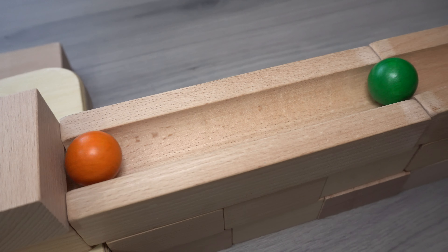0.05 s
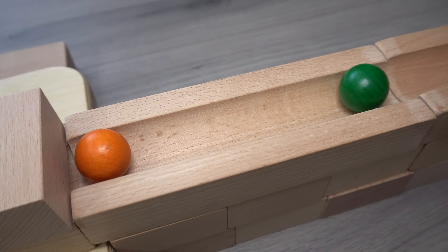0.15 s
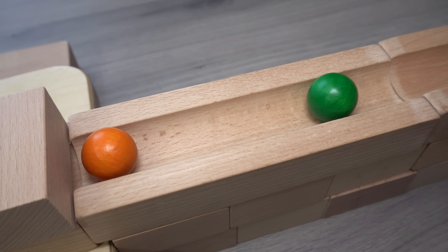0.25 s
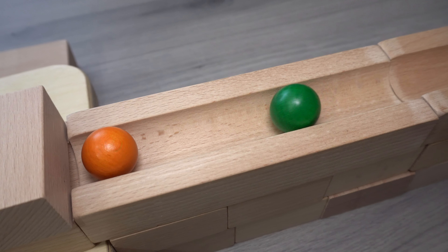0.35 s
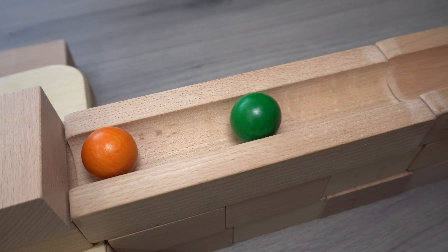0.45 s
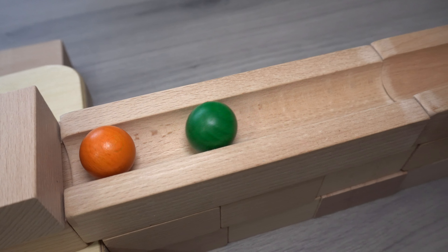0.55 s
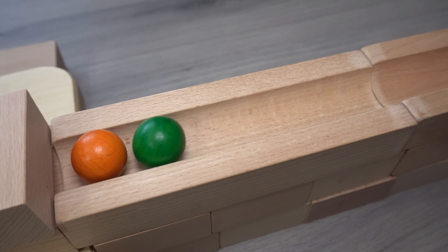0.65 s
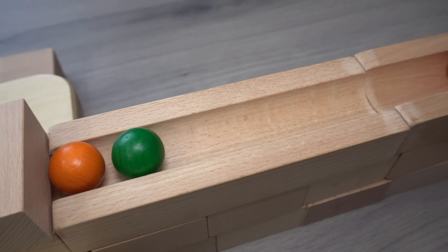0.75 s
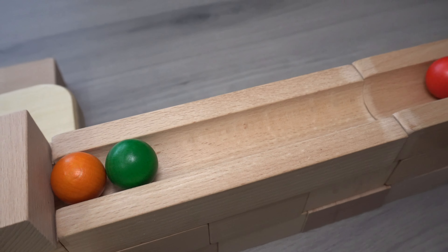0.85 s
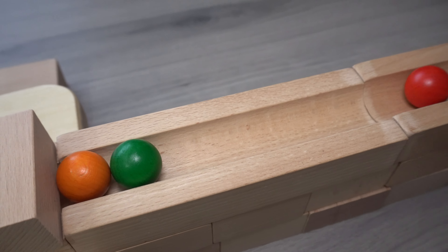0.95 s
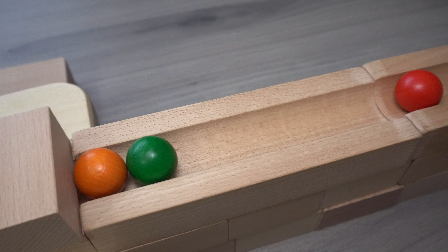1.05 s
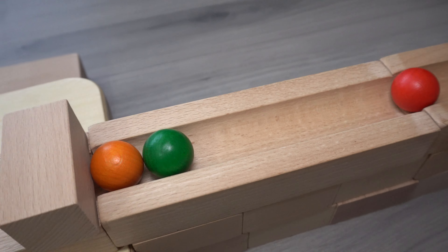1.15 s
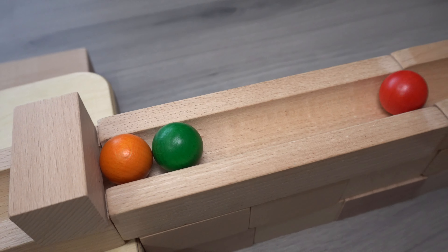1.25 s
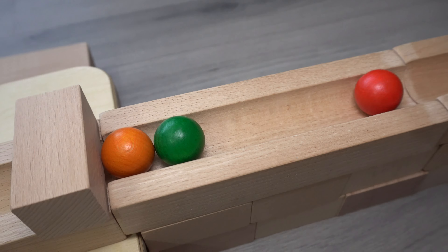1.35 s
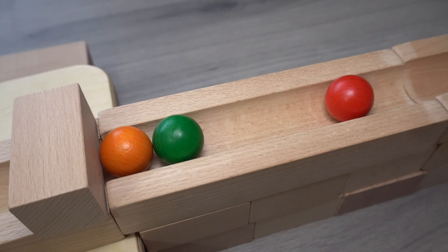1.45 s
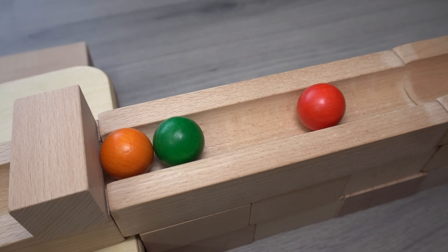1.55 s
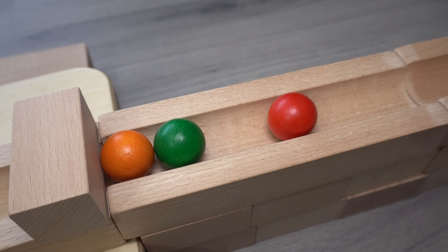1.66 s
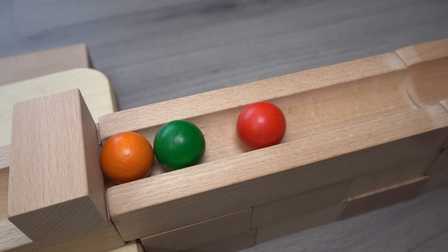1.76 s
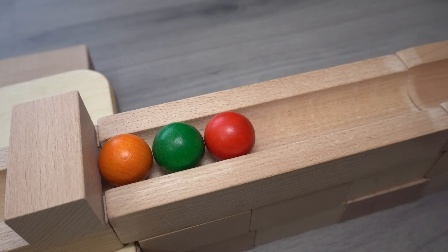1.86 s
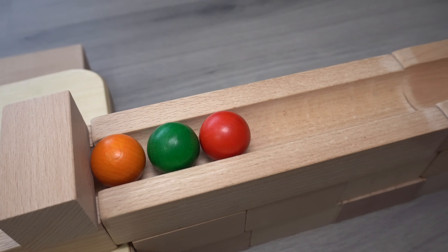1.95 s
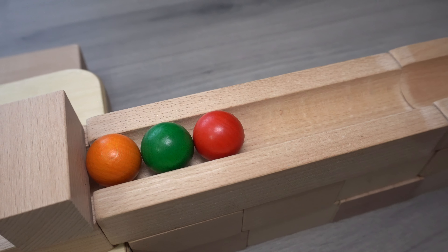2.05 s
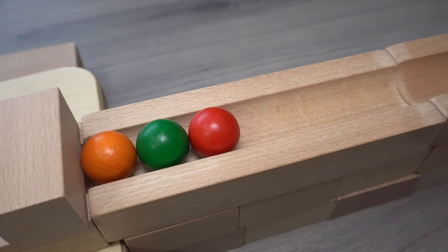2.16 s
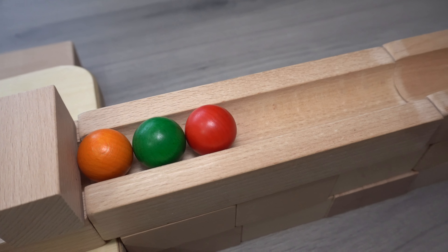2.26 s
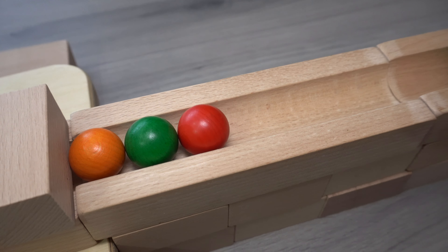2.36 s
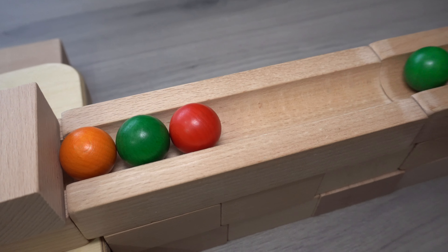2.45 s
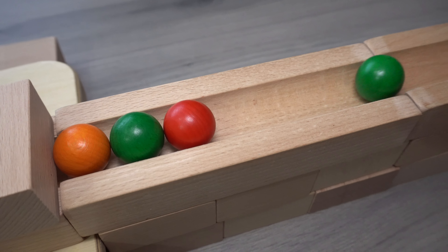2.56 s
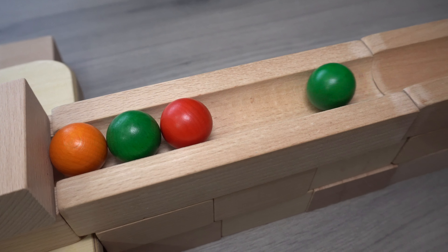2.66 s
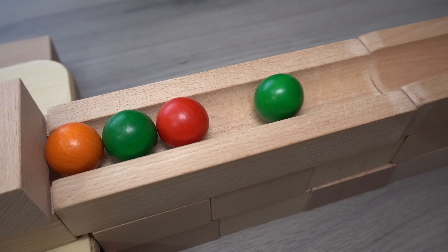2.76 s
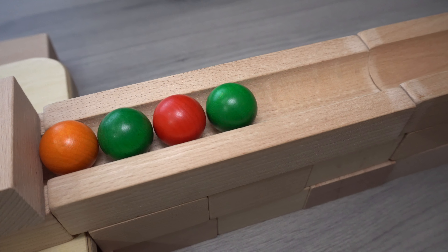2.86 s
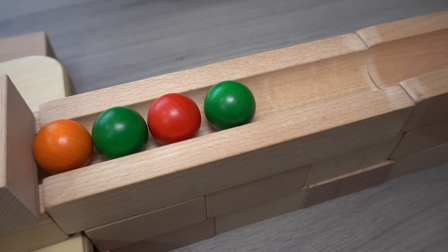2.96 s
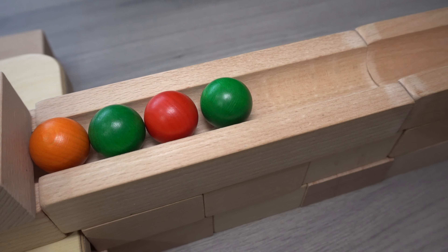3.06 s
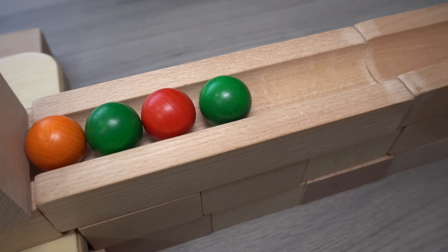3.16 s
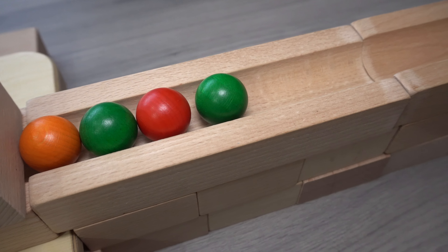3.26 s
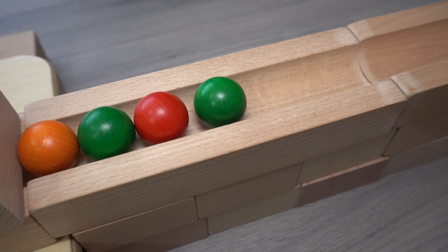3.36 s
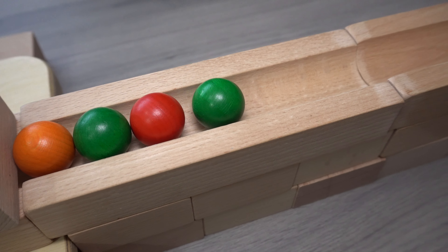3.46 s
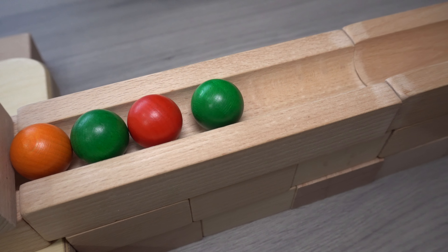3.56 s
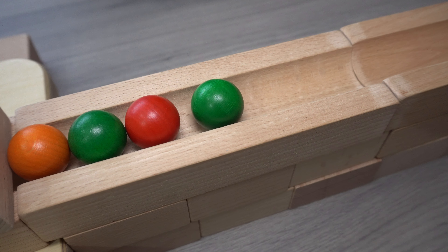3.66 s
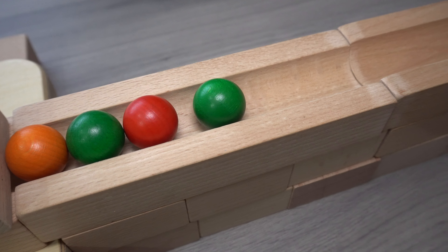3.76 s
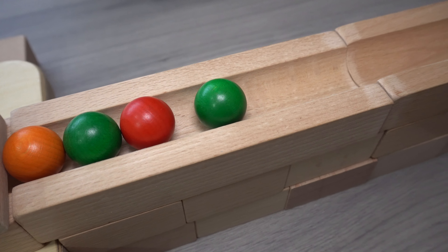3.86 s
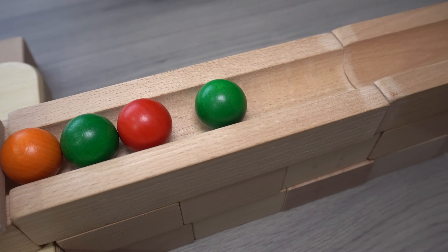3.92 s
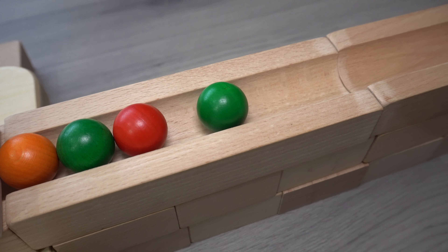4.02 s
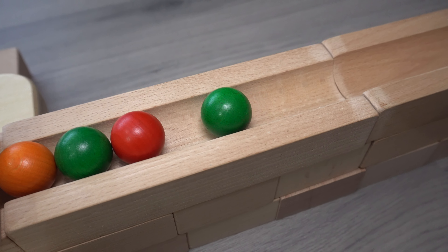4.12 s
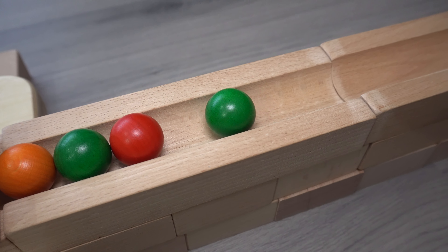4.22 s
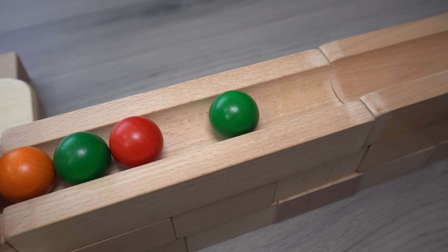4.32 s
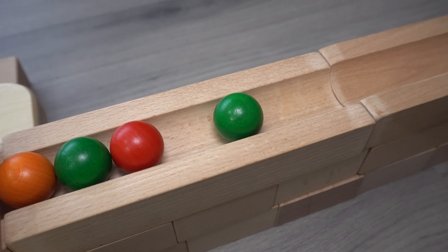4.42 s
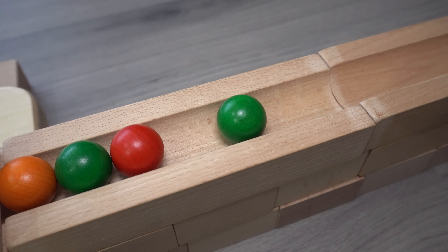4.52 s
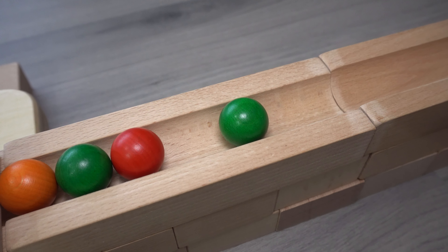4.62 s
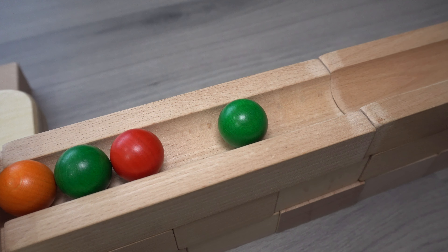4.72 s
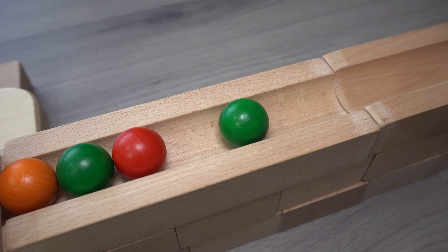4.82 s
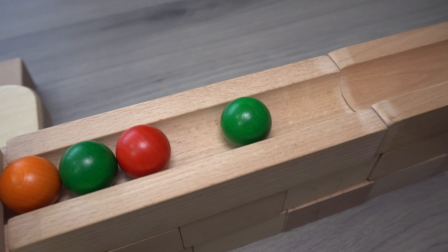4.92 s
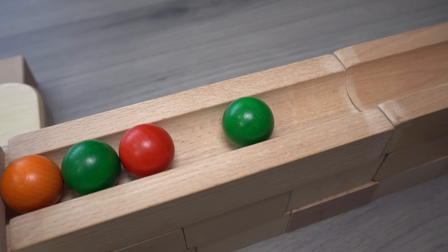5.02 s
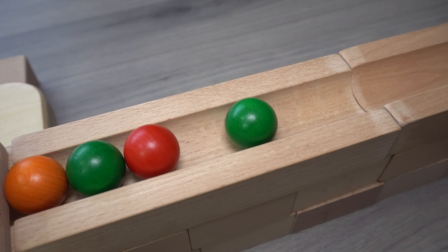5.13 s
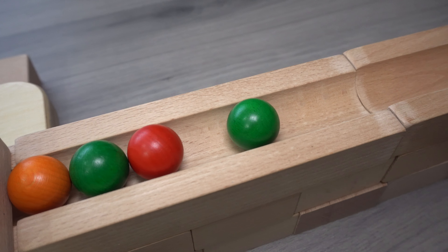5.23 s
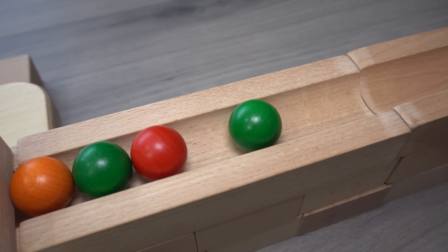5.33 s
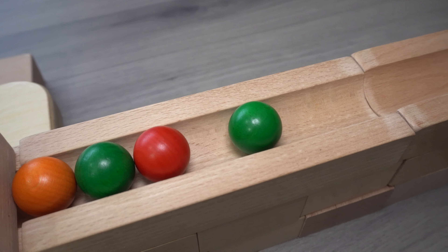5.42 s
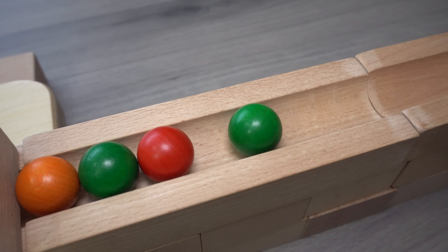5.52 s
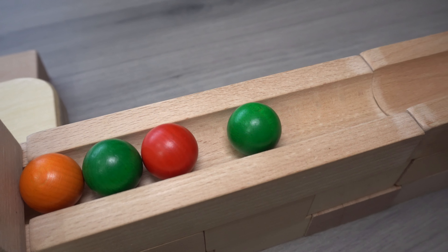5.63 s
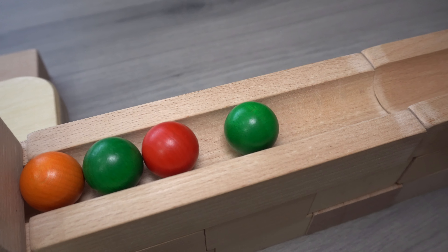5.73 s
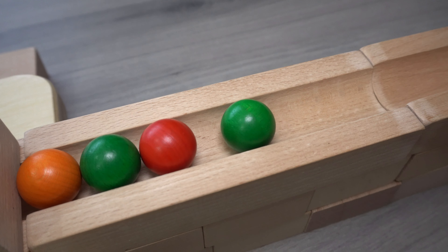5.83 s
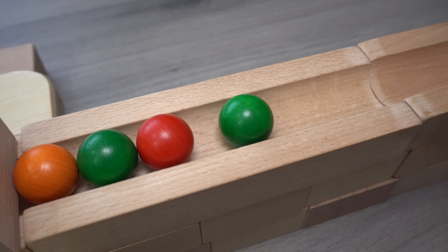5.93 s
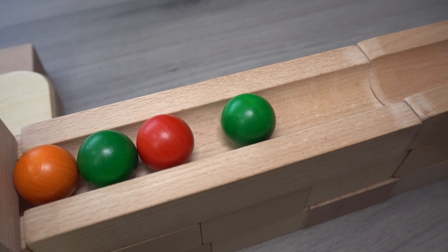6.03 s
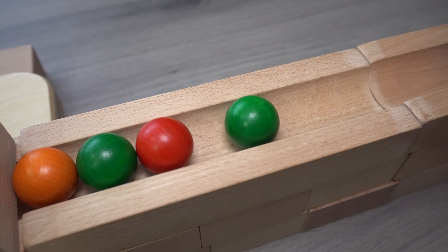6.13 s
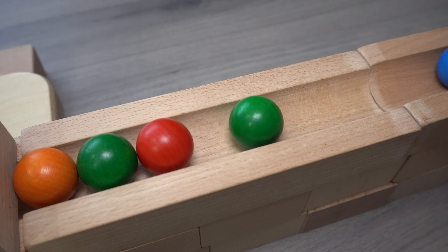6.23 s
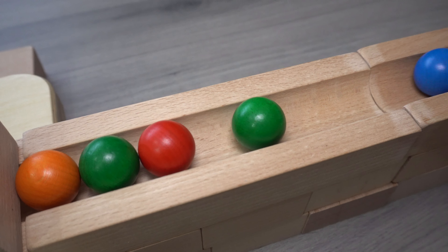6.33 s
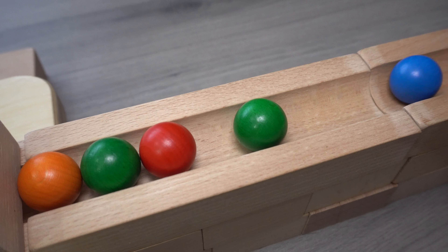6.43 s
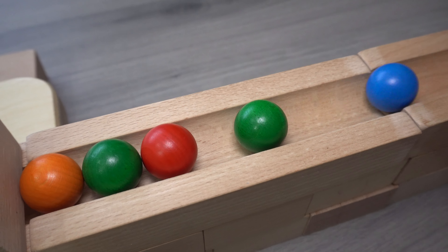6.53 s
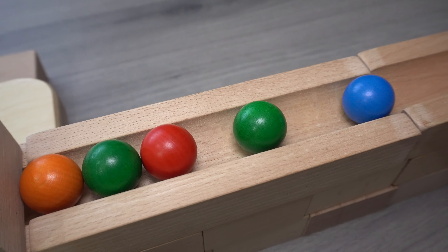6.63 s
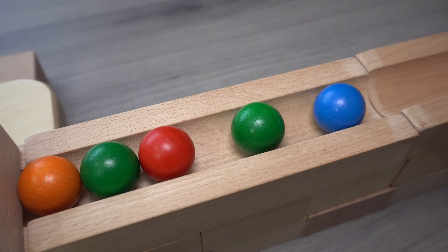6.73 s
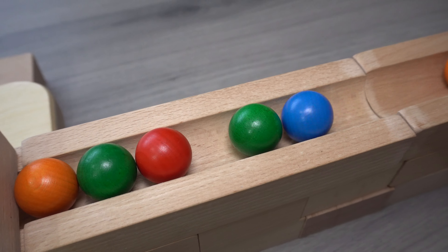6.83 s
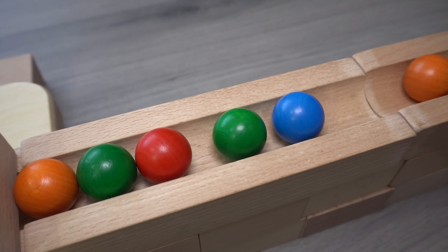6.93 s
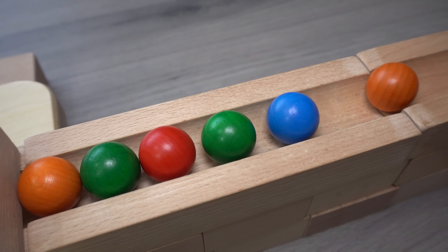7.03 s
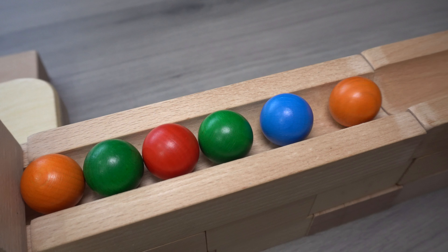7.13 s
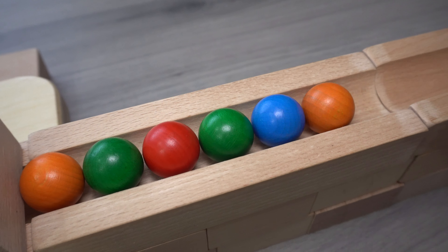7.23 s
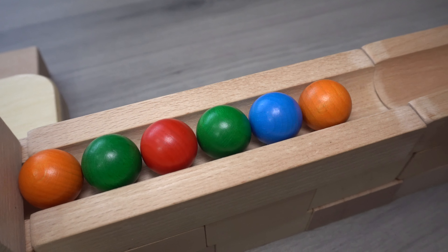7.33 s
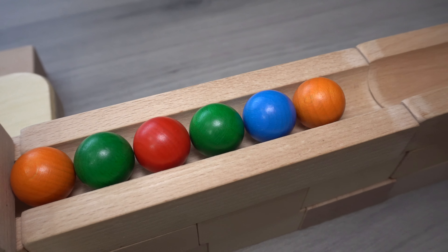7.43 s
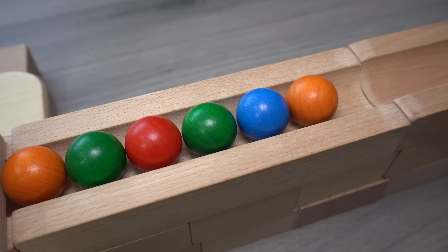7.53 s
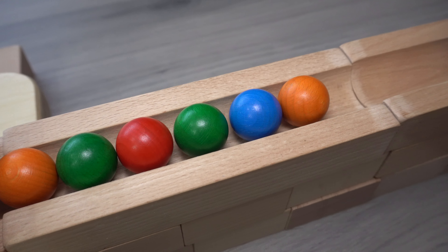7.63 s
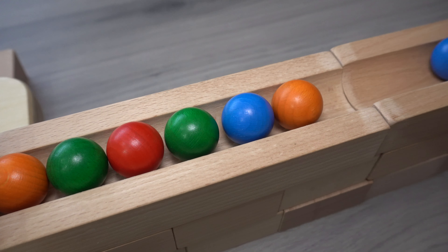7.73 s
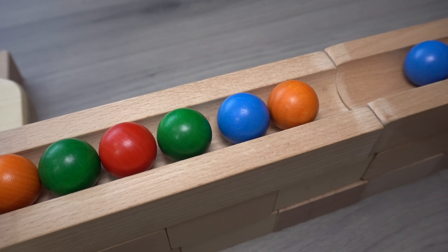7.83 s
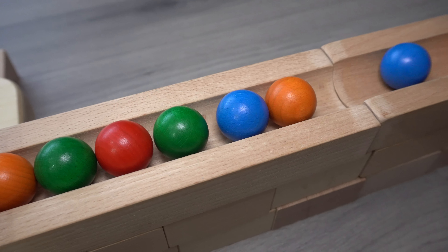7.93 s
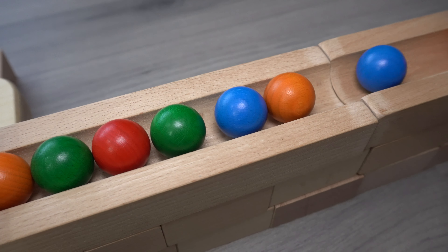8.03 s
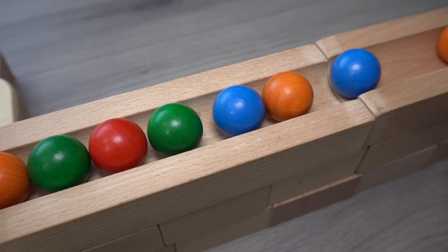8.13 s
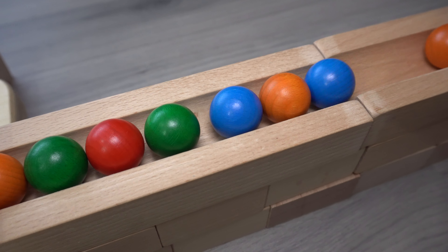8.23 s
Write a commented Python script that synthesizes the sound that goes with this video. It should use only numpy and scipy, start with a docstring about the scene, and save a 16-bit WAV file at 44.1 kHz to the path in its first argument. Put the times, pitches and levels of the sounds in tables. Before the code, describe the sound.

Close in a small room with faint steady noise, a wooden ball rattles at once and clacks hard at 0.1 s. Short block rattles at 0.5 and 0.7 s lead to three crisp clacks between 0.7 and 0.9. From 1.0 to 1.35 s a gritty skid mixes with a flurry of woody knocks. A clack at 1.9 precedes a bright, bouncing clatter at 2.1-2.3 and knocks at 2.6. A strong clack at 2.9 begins scraping strokes, dull bumps and a brief thin whistle, with lighter clacks around 3.5, fading after 4.1. A faint brush and rolling murmur remain until clatter at 5.2, a knock at 5.5, and rattles at 6.0 and 6.5. A clack at 6.9, another rattle at 7.05 and a tight cluster of clacks at 7.25 follow. At 7.8 dull bumps start rough rubbing, ending in a groan rising from 8.05 to 8.3.

```python
"""Wooden balls on a toy track

In a small room, balls clatter through ringing blocks, knock over joints, roll along a groove and
clack into a queue. Something, probably a hand or sleeve, rubs the wood in between.
Blows excite resonances; clatter, rolling and rubbing are streams of tiny random contacts, filtered
by wood. Groan and whistles are narrow unsteady tones. Steady noise lies beneath.
"""
import sys
import numpy as np
from scipy import signal
from scipy.fft import rfft, irfft
from scipy.io import wavfile

SR = 44100
rng = np.random.default_rng(int(sys.argv[2]) if len(sys.argv) > 2 else 0)


def put_to_file(sound):
    """Save the sound as 16-bit audio at rate SR, in the file named by the first command-line argument."""
    columns = np.atleast_2d(sound).T  # one column per channel
    safe = np.clip(columns, -1, 1)
    whole_steps = np.round(safe * 32767)
    wavfile.write(sys.argv[1], SR, whole_steps.astype(np.int16))


N = 365148
TIME_S = np.arange(N) / SR

# Levels in the tables are relative: trims, room and microphone follow.
# steady background noise spectrum: (f/Hz, density/dB)
AIR_SPECTRUM = [(20, -29), (82, 6.5), (141, -0.5), (310, 4), (390, -0.5), (2910, -14), (6380, -18.5),
                (16000, -24)]
AIR_DB = -53.5
# room decay: (f/Hz, t60/s)
ROOM_T60 = [(100, 0.88), (500, 0.32), (1500, 0.42), (3500, 0.36), (7000, 0.28), (15000, 0.68)]
# microphone response: (f/Hz, level/dB)
MIC_RESPONSE = [(140, -1), (300, -2.5), (600, 0.27), (1200, -0.5), (2400, 2), (4000, -0.5), (8000, 2.5),
                (15000, 1.5)]
CUTOFF_HZ = 16100

# rolling, loudest moments: (t/s, level/dB, tick share/dB)
ROLLS = [(.15, -50.5, -3.5), (.85, -54.5, 0.5), (2.65, -50, -4), (3.7, -48.5, -20), (5.08, -44.5, -31),
         (5.6, -48.5, -12.5), (6.8, -48, -2), (8.25, -45, -19)]
# rolling murmur spectrum: (f/Hz, density/dB)
ROLL_SPECTRUM = [(50, -6.5), (150, -1), (430, 1.5), (750, -5.5), (1400, -17.5), (5000, -16.5)]
ROLL_GAIN_DB_PER_S, ROLL_LOSS_DB_PER_S = 19, 14.5
TICKS_PER_S, TICK_TOP_HZ = 64, 1310

# thin whistles over rubbing and rolling: (t/s, rise/s, hold/s, t60/s, level/dB, f/Hz)
WHISTLES = [(2.955, 0.012, 0.029, .15, -33.5, 2270), (4.882, .1, 0.27, .2, -61.5, 2060)]
# groan under the last two strokes, a curve: (t/s, base f/Hz, level/dB)
GROAN_CURVE = [(8.05, 265, -36), (8.095, 310.6, -26.5), (8.135, 349.8, -35), (8.192, 409.3, -29),
               (8.234, 462.4, -24), (8.28, 497, -36)]
# groan resonances: (multiple of base f, level/dB)
GROAN_MODES = [(0.998, -2.5), (1.801, -1), (2.7, -3), (3.65, -4)]
# rubbing strokes: (t/s, rise/s, hold/s, t60/s, level/dB, bass share/dB, treble share/dB, wood ring/dB)
RUBS = [(2.679, 0.035, 0.026, 0.5, -40, 3, -9.5, 8.5), (2.814, 0.042, 0.03, 0.43, -44, -2, -3.5, 8),
        (2.893, 0.078, 0.026, 1, -27.5, -17.5, -9, 1.5), (3.095, 0.053, 0.1, 0.73, -26, -14, -8, -5),
        (3.339, 0.022, 0.026, 0.45, -32, -12, -11, -9), (3.56, 0.019, 0.03, 1, -42, -20, -15, -8),
        (3.725, 0.043, 0.035, 0.94, -46, -22, -13, 0), (3.89, 0.013, 0.053, 0.35, -29.5, -9, -10, 3),
        (4.122, 0.03, 0.03, 0.43, -45.5, -13, -17, -24), (7.782, 0.0051, 0.033, 0.68, -35, 2, -8, 5),
        (7.916, 0.0071, 0.07, 0.89, -27, -16, -12, 5.5), (8.047, 0.041, 0.019, 0.26, -25.5, -16, -9.5, 0),
        (8.135, 0.031, 0.22, .5, -26.5, -22, -5.5, -13)]
# short brushes: (t/s, level/dB, t60/s, added treble/dB)
BRUSHES = [(3.068, -23.5, 0.11, -26), (3.189, -23.5, 0.23, 23), (3.325, -25, 0.16, 10),
           (3.487, -30, 0.065, 4.5), (3.870, -32.5, 0.076, 1), (3.8931, -21, 0.12, 8),
           (4.336, -44, 0.37, -31), (4.631, -36.5, 0.23, 3), (7.946, -25.5, 0.16, 2)]
# rubbing spectrum: (f/Hz, density/dB)
RUB_SPECTRUM = [(40, -20.5), (140, 6.5), (300, 6), (650, 2.1), (1200, -3), (1750, 1), (2400, -1.5),
                (4500, -3), (7000, -11), (11000, -19), (16000, -30)]
# wood ringing under the rubbing: (f/Hz, width/Hz, level/dB)
RUBBED_MODES = [(592, 150, -3), (912, 125, 0.5), (1100, 330, -1.5), (1644, 93, 0)]
# skids along the groove: (t/s, rise/s, hold/s, t60/s, level/dB, bass share/dB, treble share/dB)
SKIDS = [(1.027, 0.024, 0.062, 0.031, -17.5, -13, -11.5), (1.125, 0.037, 0.087, 0.47, -31, -4, -20.5),
         (1.358, 0.02, 0.036, 0.12, -44, 11, 1)]
# skid spectrum: (f/Hz, density/dB)
SKID_SPECTRUM = [(50, -34), (300, -27), (600, -7), (1000, 5.5), (1450, 7), (2500, 0.5), (4000, -5.5),
                 (6300, -11.5), (8000, -19.5), (16000, -38)]
STROKE_RISE_DB = 8  # gained while getting up to speed
TREBLE_FOLLOWS = 0.92  # treble dB per dB of stroke

# dull bumps against blocks: (t/s, peak/dB, f/Hz)
BUMPS = [(0.8945, -30, 600), (2.9200, -24, 1080), (2.9520, -21, 547), (3.0660, -22, 710),
         (3.1420, -18, 725), (3.3240, -18.5, 696), (3.3385, -29, 660), (3.759, -27, 496),
         (3.871, -26.5, 550), (4.631, -32, 440), (7.7850, -21, 725), (7.7964, -15.5, 310),
         (7.8093, -21, 304), (7.8431, -23.5, 394)]
# bumped block: (multiple of its f, width/Hz, level/dB)
BUMP_MODES = [(.65, 60, 8), (1, 55.3, 16.5), (2.5, 185.2, -3)]
# knocks on the track: (t/s, peak/dB, contact hardness f/Hz, touches, touch spacing/s)
KNOCKS = [(0.0938, -23, 1800, 1, 0), (0.1222, -9, 4000, 1, 0), (0.142, -11, 1510, 1, 0),
          (1.0268, -9.5, 4960, 1, 0), (1.1197, -13, 2200, 1, 0), (1.1712, -10, 2200, 1, 0),
          (1.1984, -11, 1800, 2, 0.015), (1.2248, -12, 1800, 1, 0), (1.24, -17, 1400, 4, .009),
          (1.2761, -13, 4000, 2, .009), (1.3399, -15, 775, 3, 0.006), (2.1064, -19.5, 1700, 2, .003),
          (2.446, -29.5, 1400, 2, 0.038), (2.604, -11, 3600, 1, 0), (2.6153, -16, 3180, 1, 0),
          (2.6325, -24, 1700, 2, 0.031), (2.9026, -16, 4000, 1, 0), (3.066, -12.5, 4000, 2, .0245),
          (5.5269, -19, 3100, 1, 0), (6.875, -26, 1500, 1, 0)]
# track wood: (f/Hz, width/Hz, level/dB)
TRACK_MODES = [(800, 870, 2.5), (1060, 430, 12.2), (1476, 190, 13), (2580, 710, 4.6), (3680, 260, 6.5)]
REBOUND_LOSS_DB = 2.5  # per touch

# runs through the upper blocks: (t/s, length/s, level/dB, chatter t60/s before sag, landing peak/dB)
RUNS = [(0.0, 0.033, -25.5, 0.13, -15.5), (0.529, 0.076, -29.5, 0.4, -11), (0.667, 0.027, -34.5, 0.13, -11),
        (2.1176, 0.074, -24.5, 0.35, -15), (5.226, 0.13, -28, 0.26, -12), (6.014, 0.075, -25, 0.25, -18),
        (6.5187, 0.054, -27, 0.51, -7), (7.019, 0.0092, -31.5, 0.17, -14.5),
        (7.0532, 0.071, -26.5, 0.21, -17)]
# ringing blocks, one row per run: (low, middle, high mode f/Hz, two overtones f/Hz)
BLOCK_HZ = [(1750, 3130, 3900, 6500, 7050), (1760, 2350, 3150, 5400, 6700), (1660, 2350, 3650, 5400, 7200),
            (1690, 2750, 3690, 7650, 8450), (1750, 3170, 4080, 7100, 10700), (1770, 3190, 4050, 6050, 6900),
            (1630, 2730, 3740, 5850, 7900), (1750, 2400, 3130, 7150, 10700), (1750, 3110, 4120, 6600, 7150)]
# block balance, one row per run: (low, middle, high mode level/dB, top edge f/Hz,
# treble past the edge level/dB, wood tilt/dB per octave, ring climb towards the high mode/dB per s)
BLOCK_BALANCE = [(12, 21, 9, 4440, -15, -0.5, 0), (14, 4, 5, 3620, -13, -6, 3),
                 (14, -7, 5, 4060, -3, -6, 0), (6, 26.5, 28.5, 4240, 0, 4.5, 10),
                 (13, 14.5, 16, 3750, -5.5, -2.5, 36), (12, 27, 18, 4900, -5, 2, 0),
                 (25, 20, 17, 4100, -7, 0.5, 73), (12, 8, 11, 3300, 4, -4, 0),
                 (8, 22, 17, 4300, -5.5, 3, 0)]
# hard bounces within the clatter: (t/s, peak/dB)
BOUNCES = [(0.570, -13.5), (.6820, -15.5), (2.174, -19), (2.2037, -11.5), (2.2560, -7), (2.2636, -8),
           (2.2949, -9), (5.281, -9), (5.333, -10), (6.5689, -11), (6.6167, -9), (6.6622, -10),
           (6.6789, -9.5), (7.1350, -9), (7.1491, -7)]
# wooden rattle spectrum: (f/Hz, density/dB)
CLATTER_SPECTRUM = [(40, -38), (100, 1), (170, 4.5), (380, 2.5), (750, 4), (1400, 9), (2200, 2),
                    (3600, 4.5), (6500, -3), (16000, -16)]
# frame under the blocks: (f/Hz, width/Hz, level/dB)
FRAME_MODES = [(172, 55, 10.8)]
SWELL_S, SWELL_DB, SAG_DB_PER_S = 0.046, 2.5, 26  # swell after landing, sag as the ball loses speed
FLARE_DB, FLARE_T60_S = -27, 0.1  # chatter stirred up by a hard bounce
RING_FADE_DB_PER_S, RING_SETTLES_S = 9, 0.088

# ball meets ball: (t/s, peak/dB, f/Hz, end-block thud/dB, bright crack/dB)
CLACKS = [(0.1306, -4, 3030, -19.5, -25), (0.7397, -7, 2730, -49, -22), (0.814, -7, 2680, -19.5, -22),
          (0.8717, -11, 2350, -50, -36), (1.9200, -6.5, 2510, -26.5, -22), (2.9103, -4, 2730, -30, -36),
          (3.4375, -11, 3230, -46, -8.5), (3.5615, -20.5, 2920, -59, -33), (6.9038, -9, 4040, -38, -48),
          (7.2516, -7, 4200, -50, -46), (7.2583, -12.5, 4560, -38, -14), (7.2626, -4, 2660, -24.5, -38),
          (7.2705, -21, 4220, -31, -30), (7.3994, -17.5, 3900, -57, -38)]
# struck balls at reference pitch: (f/Hz, width/Hz, level/dB)
BALL_MODES = [(2730, 1200, 26.5), (3850, 770, 14.5)]
# end block of the queue: (f/Hz, width/Hz, level/dB)
END_BLOCK_MODES = [(250, 25, 7), (390, 110, 0.87), (632, 200, 5.1), (1000, 230, 8.2)]


def from_db(db):
    """Decibels to gain."""
    return 10 ** (np.asarray(db) / 20)


def rms_one(x):
    """Scale to rms 1."""
    return x / np.sqrt(np.mean(x ** 2) + 1e-20)


def peak_one(x):
    """Scale to peak 1."""
    return x / np.abs(x).max()


def at_hz(points, hz):
    """Read a table on a log-frequency axis."""
    table_hz, values = np.transpose(points)
    return np.interp(np.log(hz + 1), np.log(table_hz), values)


def cut(x, hz, kind, order=2):
    """Butterworth filter."""
    sos = signal.butter(order, np.clip(hz, 10, SR / 2 - 1000), kind, fs=SR, output="sos")
    return signal.sosfilt(sos, x)


def add(track, s, sound):
    """Mix a sound into a track at time s."""
    start = max(round(s * SR), 0)
    track[start:start + len(sound)] += sound[:max(N - start, 0)]


def through(x, response):
    """Convolve with an impulse response, keeping the length."""
    return signal.fftconvolve(x, response)[:len(x)]


def coloured(spectrum, size=4096):
    """Minimum-phase impulse response of a spectrum, by folding its cepstrum."""
    bins_hz = np.arange(size // 2 + 1) * SR / size
    cepstrum = irfft(np.log(from_db(at_hz(spectrum, bins_hz))))
    cepstrum[1:size // 2] *= 2
    return irfft(np.exp(rfft(cepstrum[:size // 2], size)))


def ringing(modes, size=4096):
    """Impulse response of parallel two-pole resonances."""
    out = np.zeros(size)
    impulse = signal.unit_impulse(size) + 1e-18
    for hz, width_hz, db in modes:
        r = np.exp(-np.pi * width_hz / SR)
        poles = [1, -2 * r * np.cos(2 * np.pi * hz / SR), r * r]
        out += from_db(db) * (1 - r * r) / 2 * signal.lfilter([1, 0, -1], poles, impulse)
    return out


def grains(count, per_s, spread_db):
    """Tiny random contacts of uneven strength and sign; rms 1."""
    strength_db = spread_db * np.clip(rng.standard_normal(count), -2, 2)
    sizes = from_db(strength_db) * rng.choice([-1, 1], count)
    return rms_one(sizes * (rng.random(count) < per_s / SR))


def wander(count, per_s):
    """Smooth random wobble of spread about 1: random points joined by lines."""
    steps = np.arange(count) * per_s / SR
    points = int(steps[-1]) + 2
    return np.interp(steps, np.arange(points), rng.standard_normal(points))


def controls(rows):
    """Columns of a curve, sample by sample over its own span."""
    s, *columns = np.transpose(rows)
    span_s = np.arange(s[0], s[-1], 1 / SR)
    return [np.interp(span_s, s, column) for column in columns]


def stroke(age_s, rise_s, hold_s, t60_s, rise_db):
    """Rise, hold and release of one movement, in dB below its top."""
    rise = -rise_db * np.clip(1 - age_s / rise_s, 0, 1)
    return rise - 60 * np.maximum(age_s - rise_s - hold_s, 0) / t60_s


def scattered(x, db, t60_s):
    """A blow runs back and forth through the wood: a short, dense after-ring."""
    spread = rng.standard_normal(len(x)) * from_db(-60 * TIME_S[:len(x)] / t60_s)
    return x + from_db(db) * through(x, spread / np.sqrt(np.sum(spread ** 2)))


def bending(x, delay_s=0.0078, middle_hz=700):
    """Bending waves: low notes travel slowest, so a thud sweeps down; delay_s holds at middle_hz."""
    hz = np.arange(len(x) + 1) * SR / (2 * len(x))
    phase = 4 * np.pi * delay_s * np.sqrt(hz * middle_hz)
    return irfft(rfft(x, 2 * len(x)) * np.exp(-1j * phase))[:len(x)]


def shifting(contacts, modes, shift_db, glide, per_s):
    """The contact point moves, so each mode swells, fades and drifts in pitch on its own."""
    count, out = len(contacts), 0.0
    for mode in modes:
        uneven = contacts * from_db(shift_db * wander(count, per_s))
        ring = through(uneven, ringing([mode]))
        read_at = np.cumsum(np.exp(glide * wander(count, per_s)))
        out = out + np.interp(read_at, np.arange(count), ring, right=0)
    return out


def unsteady(turn, per_s):
    """A narrow noise band: a tone whose sine and cosine parts wander apart."""
    sine = wander(len(turn), per_s) * np.sin(turn)
    return sine + wander(len(turn), per_s) * np.cos(turn)


def friction(row, spectrum, per_s, spread_db, catch_db, modes=(), surge_db=1.46):
    """Grain catches unevenly under a stroke; all bands swell with it, treble slightly less."""
    s, rise_s, hold_s, t60_s, db, bass_db, treble_db = row
    speed_db = stroke(TIME_S[:SR * 3 // 4], rise_s, hold_s, t60_s, STROKE_RISE_DB)
    count = len(speed_db)
    grip_db = catch_db * wander(count, per_s=110) + surge_db * wander(count, per_s=34)
    contacts = from_db(grip_db) * grains(count, per_s, spread_db)
    grit = through(contacts, coloured(spectrum))
    grit = grit + shifting(contacts, modes, shift_db=1.5, glide=0.12, per_s=17.3)
    bass = rms_one(cut(grit, 500, "low", order=4))
    middle = rms_one(cut(grit, [500, 4500], "band", order=4))
    treble = rms_one(cut(grit, 4500, "high", order=4))
    sound = from_db(bass_db + speed_db) * bass + from_db(speed_db) * middle
    sound += from_db(treble_db + TREBLE_FOLLOWS * speed_db) * treble
    out = np.zeros(N)
    add(out, s, from_db(db) * sound)
    return out


def air():
    """Steady background: filtered white noise."""
    return from_db(AIR_DB) * rms_one(through(rng.standard_normal(N), coloured(AIR_SPECTRUM)))


def room(x, first_s=0.00078, build_s=0.016, dull_hz=9000):
    """Diffuse reflections build up, then decay band by band; energy 1 before the treble cut."""
    age_s, tail = TIME_S[:SR * 2 // 3], 0
    edges_hz = np.geomspace(50, 18000, 10)
    for low_hz, high_hz in zip(edges_hz, edges_hz[1:]):
        fade = np.exp(-np.log(1000) * age_s / at_hz(ROOM_T60, np.sqrt(low_hz * high_hz)))
        tail = tail + fade * cut(rng.standard_normal(len(age_s)), [low_hz, high_hz], "band")
    tail = tail * np.clip((age_s - first_s) / build_s, 0, 1)
    return through(x, cut(tail / np.sqrt(np.sum(tail ** 2)), dull_hz, "low", order=1))


def rolling():
    """Balls murmur over the fine grain of the chute and tick on its small flaws."""
    murmur = through(grains(N, per_s=3000, spread_db=1), coloured(ROLL_SPECTRUM))
    murmur = cut(murmur, 5000, "low", order=4)
    ticks = through(grains(N, TICKS_PER_S, spread_db=4), ringing(TRACK_MODES))
    ticks = cut(ticks, TICK_TOP_HZ, "low")
    murmur_db, ticks_db = -np.inf, -np.inf
    for s, db, share_db in ROLLS:
        roll_db = db - np.maximum(ROLL_GAIN_DB_PER_S * (s - TIME_S), ROLL_LOSS_DB_PER_S * (TIME_S - s))
        murmur_db = np.maximum(murmur_db, roll_db)
        ticks_db = np.maximum(ticks_db, roll_db + share_db)
    return from_db(murmur_db) * rms_one(murmur) + from_db(ticks_db) * rms_one(ticks)


def whistles(wander_per_s=260):
    """A narrow, unsteady tone swells and dies away."""
    out, age_s = np.zeros(N), TIME_S[:SR // 2]
    for s, rise_s, hold_s, t60_s, db, hz in WHISTLES:
        tone = rms_one(unsteady(2 * np.pi * hz * age_s, wander_per_s))
        add(out, s, from_db(db + stroke(age_s, rise_s, hold_s, t60_s, STROKE_RISE_DB)) * tone)
    return out


def groan(wander_per_s=70):
    """Friction feeds a few narrow resonances that glide up together."""
    hz, db = controls(GROAN_CURVE)
    turn = 2 * np.pi * np.cumsum(hz) / SR
    sound = sum(from_db(level) * unsteady(k * turn, wander_per_s) for k, level in GROAN_MODES)
    out = np.zeros(N)
    add(out, GROAN_CURVE[0][0], from_db(db) * rms_one(sound))
    return out


def brushes(trim_db=-1, bright_hz=6000):
    """Short brushes of dense grit that die away at once."""
    out, age_s = np.zeros(N), TIME_S[:SR // 4]
    for s, db, t60_s, bright_db in BRUSHES:
        grit = through(grains(len(age_s), per_s=9000, spread_db=1), coloured(RUB_SPECTRUM))
        grit = rms_one(grit + from_db(bright_db) * cut(grit, bright_hz, "high", order=1))
        add(out, s, from_db(db + trim_db - 60 * age_s / t60_s) * grit)
    return out


def rubbing(trim_db=-0.5):
    """Long sliding strokes set the wood ringing."""
    out = np.zeros(N)
    for *row, ring_db in RUBS:
        modes = [(hz, width_hz, db + ring_db) for hz, width_hz, db in RUBBED_MODES]
        out += friction(row, RUB_SPECTRUM, per_s=4200, spread_db=3, catch_db=1.8, modes=modes)
    return from_db(trim_db) * out


def skids(trim_db=-3.5):
    """A ball skids over the grain of the groove."""
    return from_db(trim_db) * sum(
        friction(row, SKID_SPECTRUM, per_s=5600, spread_db=2, catch_db=1.5, surge_db=0.5)
        for row in SKIDS)


def bumps(top_hz=1400):
    """Dull bumps ring a few low block modes."""
    out = np.zeros(N)
    for s, db, pitch_hz in BUMPS:
        block = ringing([(k * pitch_hz, width_hz, level) for k, width_hz, level in BUMP_MODES])
        add(out, s, from_db(db) * peak_one(cut(block, top_hz, "low")))
    return out


def knocks(top_hz=4100, scatter_db=2):
    """Each touch rebalances the track modes; soft contacts lose treble, rebounds grow weaker."""
    out = np.zeros(N)
    for s, db, hard_hz, touches, gap_s in KNOCKS:
        for k in range(round(touches)):
            wood = ringing([(hz * rng.normal(1, 0.033), width_hz, level + scatter_db * rng.normal())
                            for hz, width_hz, level in TRACK_MODES])
            touch = cut(cut(wood, hard_hz, "low"), top_hz, "low", order=14)
            add(out, s + k * gap_s, from_db(db - k * REBOUND_LOSS_DB) * peak_one(touch))
    return out


def rattle(age_s, contacts, pitches_hz, balance):
    """Contacts excite broad wood, drifting block modes, thin overtones and the frame."""
    *levels_db, edge_hz, treble_db, _, climb_db_per_s = balance
    wood = block_wood(balance)
    on_wood, on_edges = contacts * rng.choice([-1, 1], (2, len(age_s)))
    sound = through(on_wood, wood)
    for k, (hz, level_db) in enumerate(zip(pitches_hz, levels_db)):
        slope_db_per_s = (k - 1) * climb_db_per_s - RING_FADE_DB_PER_S
        ring = shifting(contacts, [(hz, 100, level_db)], shift_db=1, glide=0.00884, per_s=52)
        sound += from_db(slope_db_per_s * np.minimum(age_s, RING_SETTLES_S)) * ring
    treble = cut(cut(through(on_edges, wood), edge_hz, "high"), edge_hz, "low")
    overtones = [(hz, 200, 9) for hz in pitches_hz[len(levels_db):]]
    treble += through(treble, ringing(overtones))
    sound = cut(sound, edge_hz, "low", order=14) + from_db(treble_db) * treble
    sound += through(contacts, ringing(FRAME_MODES))
    return sound / np.std(sound[age_s < RING_SETTLES_S])


def block_wood(balance):
    """Broad wood response, tilted over 1.5 octaves above 1200 Hz."""
    tilt_db = balance[5]
    return coloured([(hz, level + tilt_db * np.clip(np.log2(hz / 1200), 0, 1.5))
                     for hz, level in CLATTER_SPECTRUM])


def hard_bounce(pitches_hz, balance):
    """One hard blow: broad wood, damped block modes and the track."""
    *levels_db, edge_hz, _, _, _ = balance
    damped = ringing([(hz, 330, level) for hz, level in zip(pitches_hz, levels_db)])
    blow = block_wood(balance) + from_db(-6) * damped + from_db(-10) * ringing(TRACK_MODES)
    return cut(blow, edge_hz, "low", order=14)


def clatter(trim_db=-3, bounce_trim_db=-6):
    """A ball lands on the upper blocks and chatters through them with a few hard bounces."""
    out, age_s = np.zeros(N), TIME_S[:SR // 2]
    next_starts = [run[0] for run in RUNS[1:]] + [TIME_S[-1]]
    for run, until, pitches_hz, balance in zip(RUNS, next_starts, BLOCK_HZ, BLOCK_BALANCE):
        start, length_s, db, t60_s, landing_db = run
        contacts = grains(len(age_s), per_s=1400, spread_db=3)
        sound = rattle(age_s, contacts, pitches_hz, balance)
        blow = hard_bounce(pitches_hz, balance)
        bounces = [(s, peak_db) for s, peak_db in BOUNCES if start < s < until]
        for s, peak_db in [(start, landing_db)] + bounces:
            add(out, s, from_db(peak_db + bounce_trim_db) * peak_one(scattered(blow, db=1, t60_s=0.019)))
        swell_db = stroke(age_s, SWELL_S, length_s - SWELL_S, t60_s, SWELL_DB)
        vigour = from_db(db + swell_db - SAG_DB_PER_S * age_s)
        for s, peak_db in bounces:
            since_s = age_s - (s - start)
            flare = from_db(peak_db + FLARE_DB - 60 * np.abs(since_s) / FLARE_T60_S)
            vigour = np.hypot(vigour, (since_s > 0) * flare)
        add(out, start, from_db(trim_db) * vigour * sound)
    return out


def end_block_thud(top_hz=1050, push_db=1):
    """The queue hands the blow to the end block: a push at once, then a falling thud."""
    thud = ringing([(hz * rng.normal(1, 0.065), width_hz, level + rng.normal(0, 1.2))
                    for hz, width_hz, level in END_BLOCK_MODES])
    thud = cut(thud, top_hz, "low", order=4)
    return from_db(push_db) * peak_one(thud) + peak_one(bending(thud))


def clacks(contact_hz=4650, crack_top_hz=8800, trim_db=-0.5):
    """Two hard balls give a millisecond snap, brighter and longer at higher pitch, plus a thud."""
    out = np.zeros(N)
    for s, db, pitch_hz, thud_db, crack_db in CLACKS:
        ratio = pitch_hz / BALL_MODES[0][0]
        balls = ringing([(hz * ratio, width_hz / ratio, level) for hz, width_hz, level in BALL_MODES])
        crack = from_db(crack_db) * cut(balls, crack_top_hz, "low", order=3)
        snap = peak_one(cut(balls, contact_hz, "low", order=10) + crack)
        add(out, s, from_db(db + trim_db) * scattered(snap, db=-13, t60_s=0.022))
        add(out, s, from_db(thud_db) * end_block_thud())
    return out


def scene():
    """Direct sound of all sources, and room sound of all but rolling and air."""
    # (sound, room send in dB)
    sources = [(rubbing() + brushes() + groan() + whistles(), -7), (skids(), -12),
               (knocks() + bumps(), -7), (clatter(), -2), (clacks(), -7)]
    direct = sum(sound for sound, _ in sources)
    reflected = room(sum(from_db(wet_db) * sound for sound, wet_db in sources))
    return (direct + reflected + rolling() + air())[None]


def record(dry):
    """The microphone colours the sound slightly; the top is cut steeply."""
    heard = through(dry[0], coloured(MIC_RESPONSE))[None]
    return signal.sosfilt(signal.ellip(10, 0.1, 80, CUTOFF_HZ, fs=SR, output="sos"), heard)


dry = scene()
out = record(dry)
put_to_file(out)
```